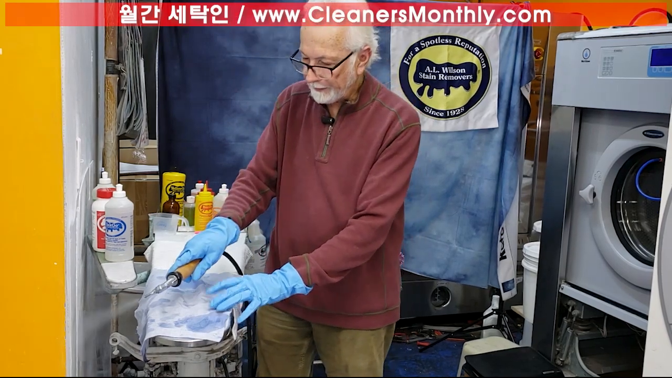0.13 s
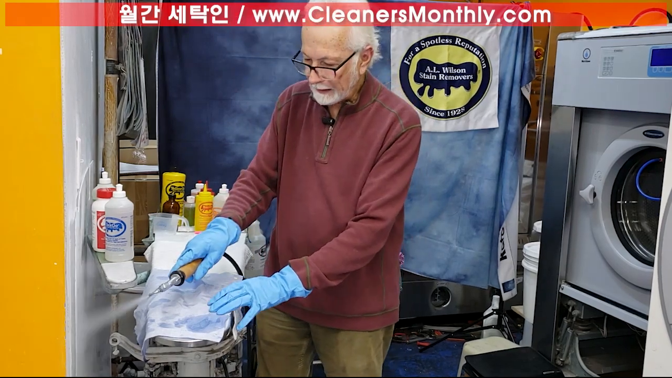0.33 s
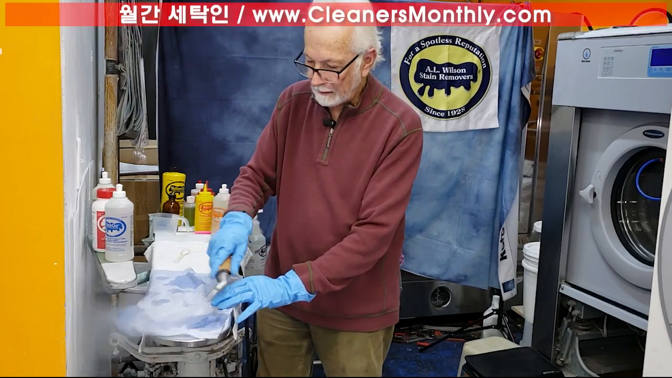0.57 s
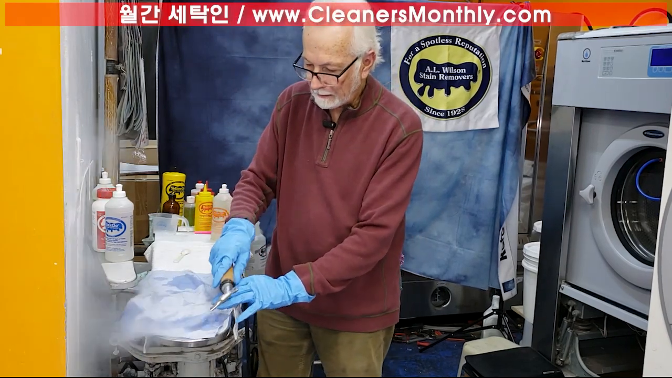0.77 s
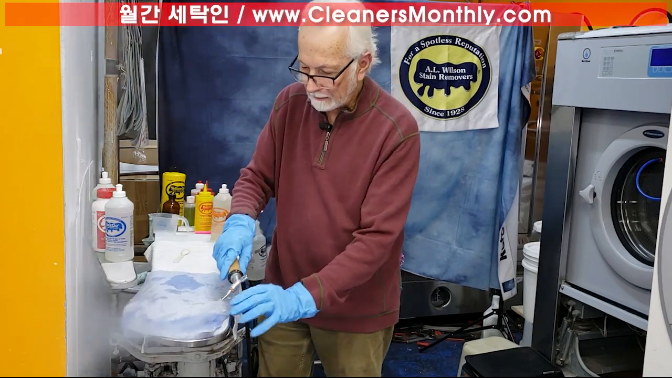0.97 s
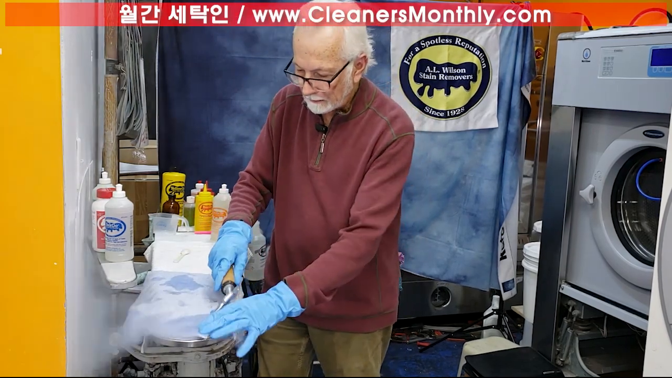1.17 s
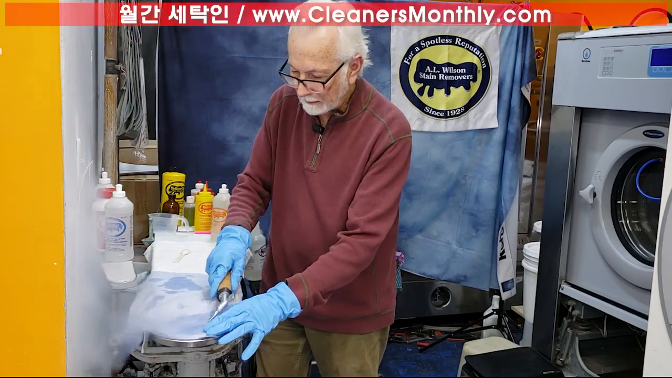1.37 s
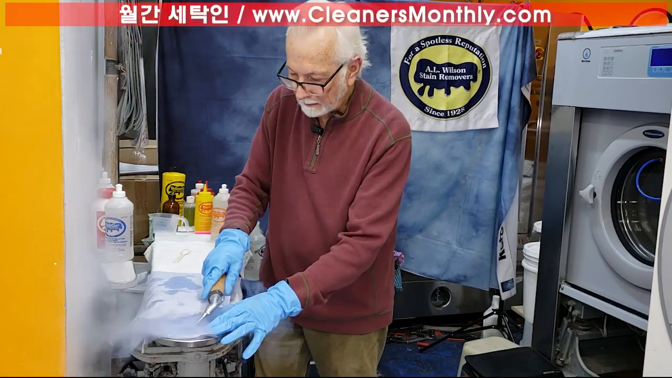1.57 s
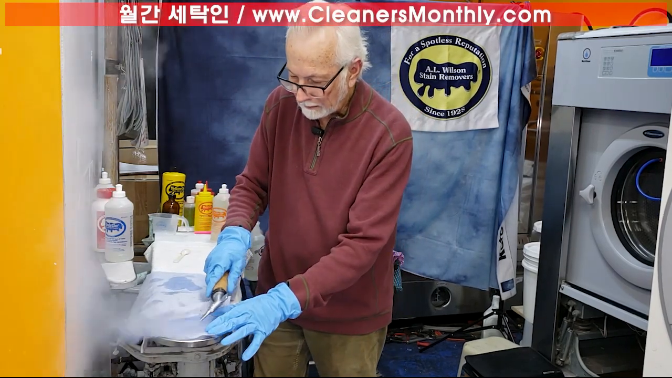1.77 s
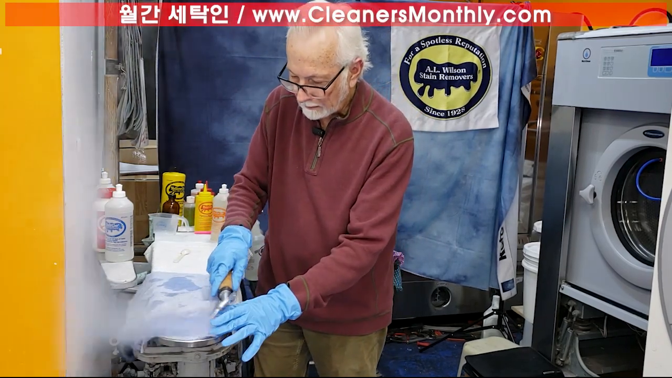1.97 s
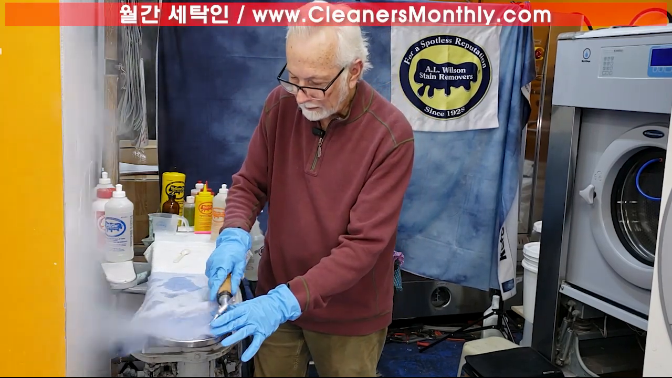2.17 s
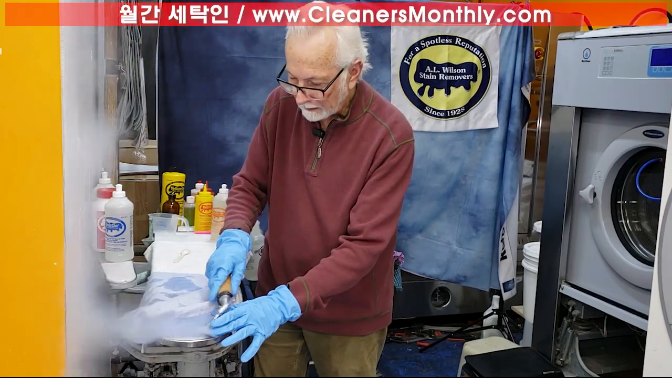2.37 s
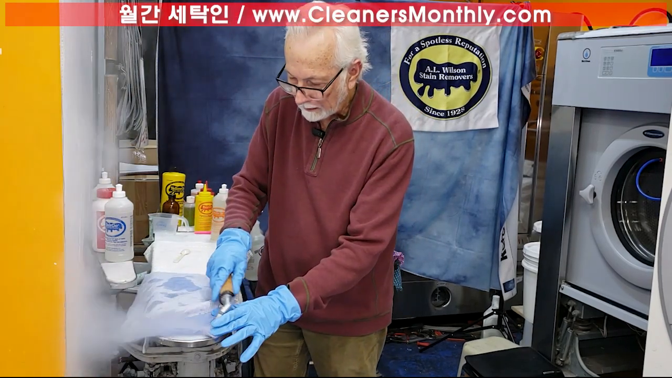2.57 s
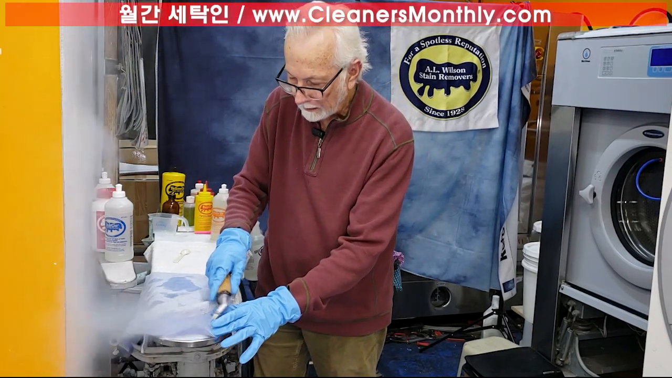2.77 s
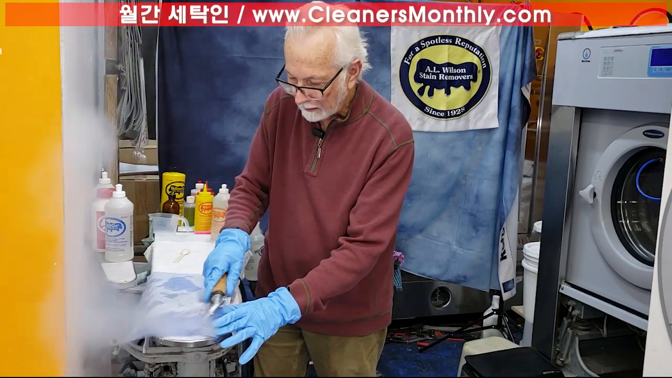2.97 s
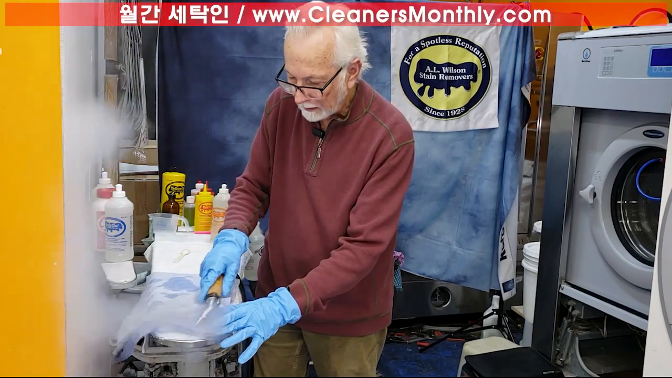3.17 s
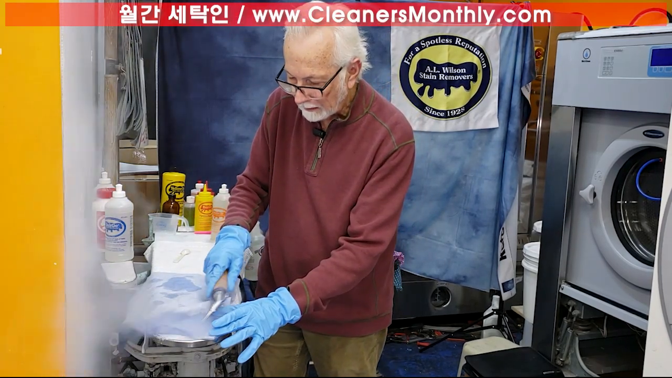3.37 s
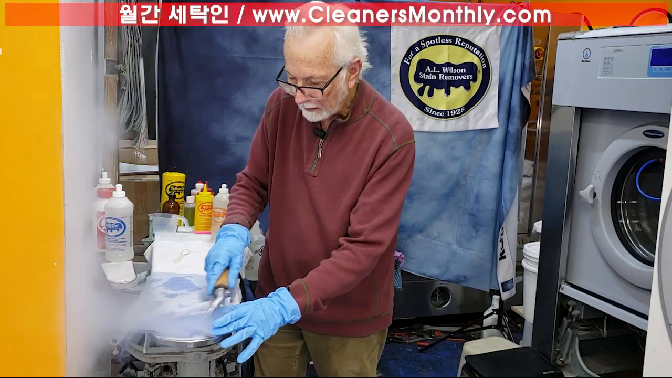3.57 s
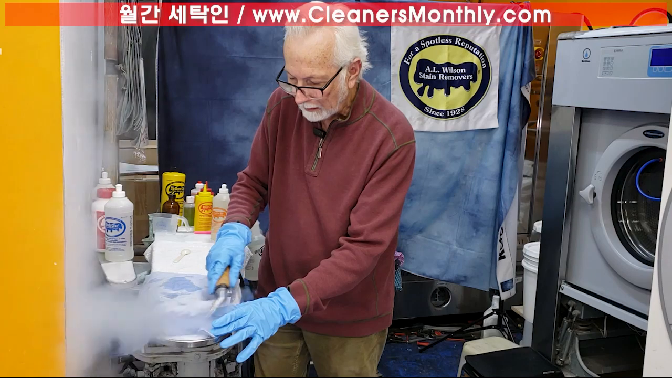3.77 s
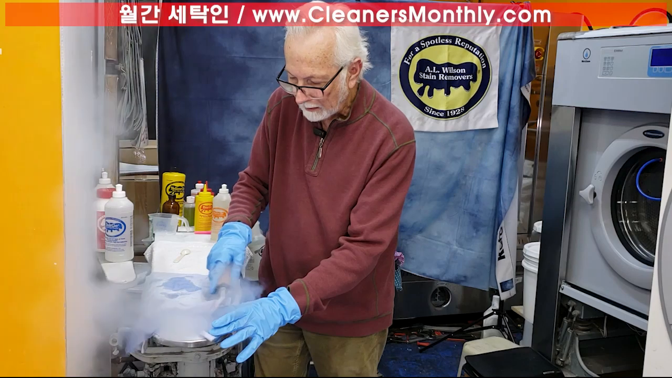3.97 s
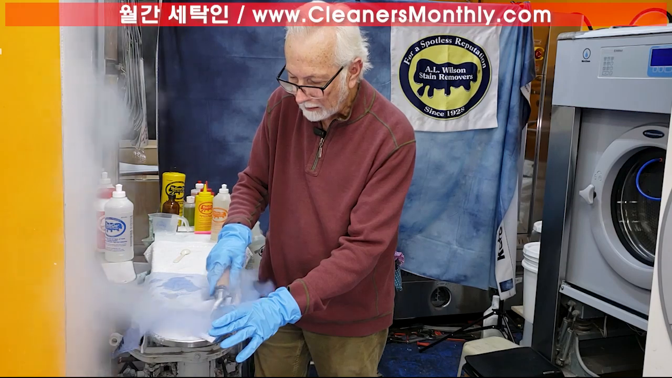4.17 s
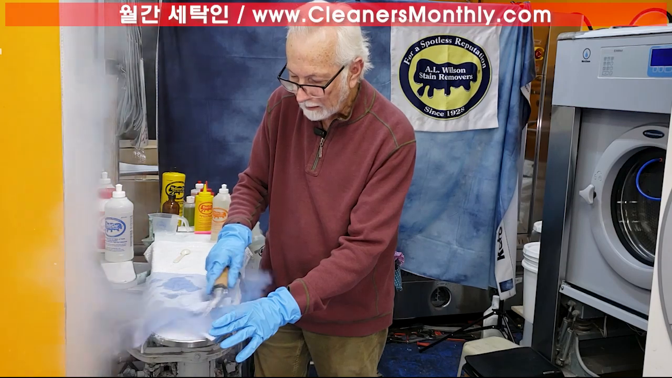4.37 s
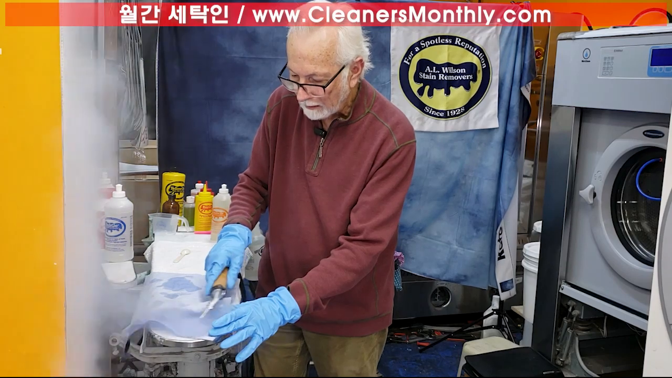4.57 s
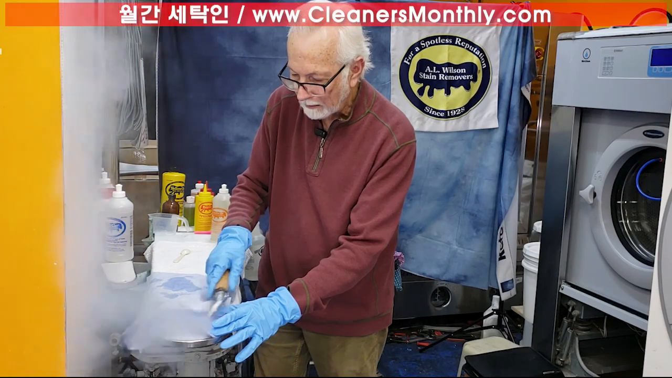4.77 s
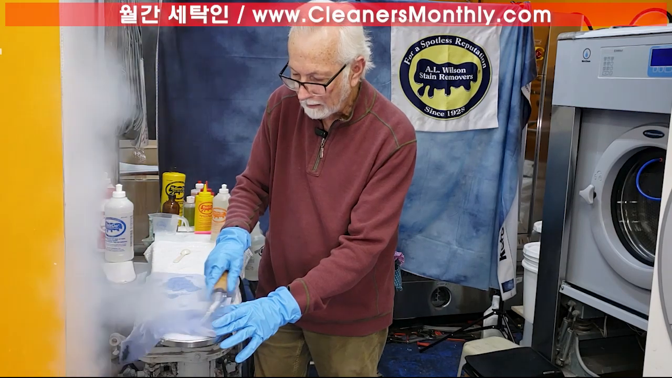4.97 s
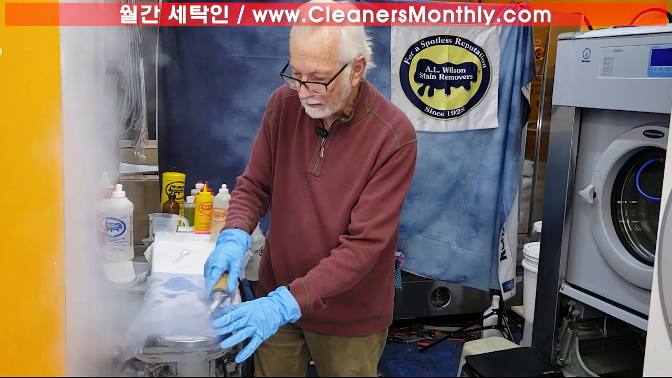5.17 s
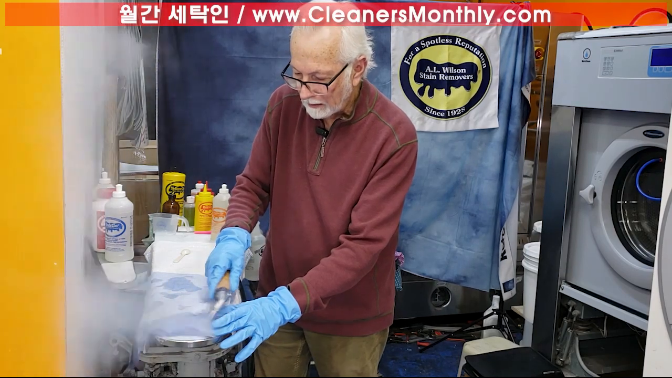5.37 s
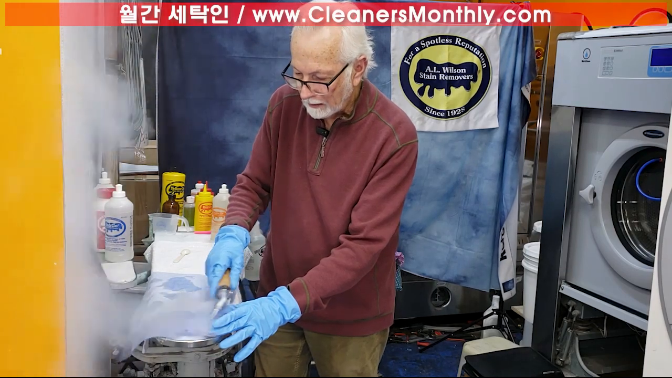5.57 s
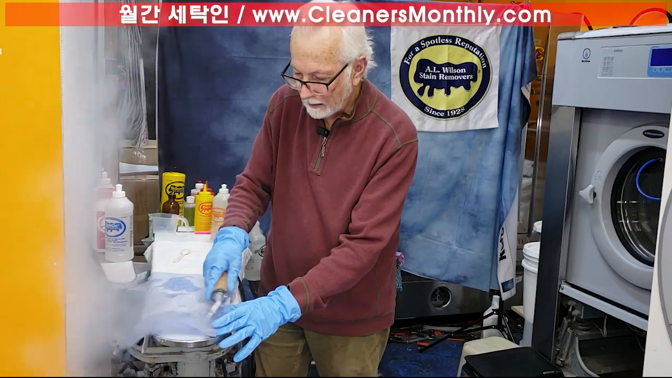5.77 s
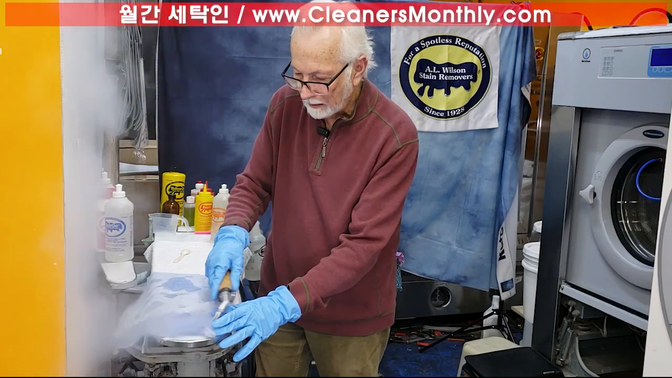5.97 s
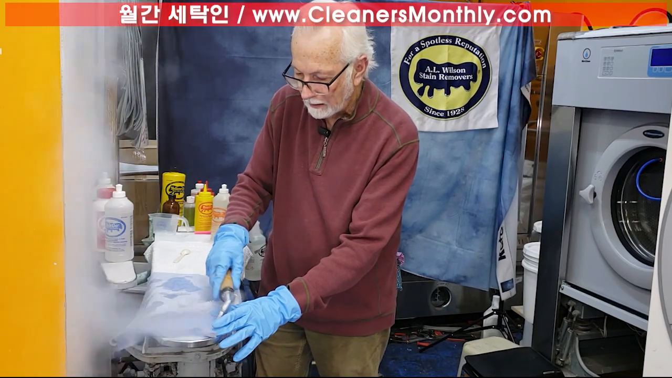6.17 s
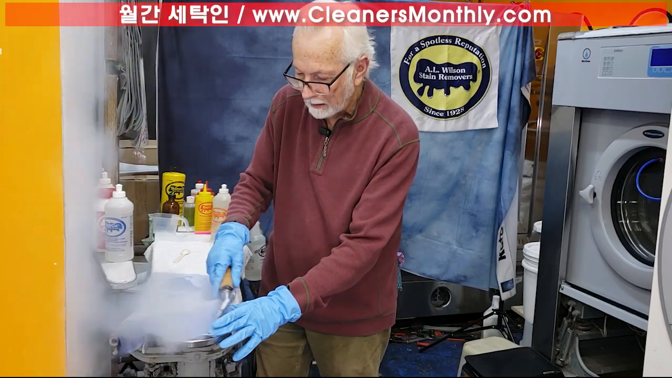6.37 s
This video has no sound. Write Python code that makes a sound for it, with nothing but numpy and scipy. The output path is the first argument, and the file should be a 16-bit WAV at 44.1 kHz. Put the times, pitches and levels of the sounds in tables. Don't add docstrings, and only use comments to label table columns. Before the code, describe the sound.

For a fraction of a second there is only faint motor hum and a small dull ring. Then a steam gun opens with a thin singing hiss that quickly swells into a loud, bright jet. Against cloth it adds a lower roar and rasp, brief breathy whistles and soft slaps. The hiss dips midway and surges again near the end. Close, dry, single chest microphone in a small workshop.

```python
import sys
import numpy as np
from scipy import signal
from scipy.fft import rfft, irfft, next_fast_len
from scipy.io import wavfile

SR = 44100
rng = np.random.default_rng(int(sys.argv[2]) if len(sys.argv) > 2 else 0)


def generate_wav(signal):
    frames = np.transpose(np.atleast_2d(signal))
    scaled = np.clip(frames, -1, 1) * 32767
    pcm = np.round(scaled).astype(np.int16)
    wavfile.write(sys.argv[1], SR, pcm)


def convert_level_to_amplitude(level_db):
    exponent = np.asarray(level_db, float) / 20
    return 10 ** exponent


N = 283122
T = np.arange(N) / SR
SIZE = next_fast_len(N)
HZ = np.maximum(np.arange(SIZE // 2 + 1) * SR / SIZE, 1)
OCTAVE = np.log2(HZ)


def rms_one(x):
    return x / np.sqrt(np.mean(x ** 2) + 1e-20)


def in_time(rows):
    s, *columns = np.transpose(rows)
    return [np.interp(T, s, column) for column in columns]


def swells(rows, point=1.9):
    s, length, *columns = np.transpose(rows)
    coarse = T[::64]
    phase = np.clip((coarse - s[:, None]) / (1.26 * length[:, None]), -0.5, 0.5)
    bumps = np.cos(np.pi * phase).clip(0) ** point
    return [np.interp(T, coarse, column @ bumps) for column in columns]


def before(s, fade_s):
    return np.clip((s - T) / fade_s, 0, 1)


def drift(rate, depth_db):
    r = np.exp(-40 * np.pi * rate / SR)
    coarse = rng.standard_normal(N // 20 + 4002)
    slow = signal.lfilter([1], [1, -2 * r, r * r], coarse)[4000:]
    return np.interp(np.arange(N) / 20, np.arange(len(slow)), convert_level_to_amplitude(depth_db * rms_one(slow)))


def coloured(points):
    hz, db = np.transpose(points)
    return rfft(rng.standard_normal(SIZE)) * convert_level_to_amplitude(np.interp(np.log(HZ), np.log(hz), db))


def above(edge_hz, soft):
    x = np.clip((OCTAVE - np.log2(edge_hz)) / soft + 0.5, 0, 1)
    return x * x * (3 - 2 * x)


def turbulence(points, zones_hz, levels_db, shared, patchy_db, patch_rate, soft, count):
    out = 0
    noises = [coloured(points), coloured(points)]
    zones = zip(zones_hz, zones_hz[1:], levels_db, patchy_db)
    for z, (low, high, level_db, flicker_db) in enumerate(zones):
        shares = [above(hz, soft) for hz in np.geomspace(low, high, count + 1)]
        zone = 0
        for k in range(count):
            gain = np.sqrt(np.abs(shares[k] - shares[k + 1]))
            strip = irfft(noises[(z * count + k) % 2] * gain, SIZE)[:N]
            zone = zone + strip * drift(patch_rate, flicker_db)
        out = out + rms_one(zone * shared) * convert_level_to_amplitude(level_db)
    return out


def whistle(s, length, hz, width_hz, db):
    start, size = round((s - length) * SR), round(2 * length * SR)
    r = np.exp(-np.pi * width_hz / SR)
    tone = rng.standard_normal(SR * 3 // 4)
    for _ in range(2):
        tone = signal.lfilter([1, 0, -1], [1, -2 * r * np.cos(2 * np.pi * hz / SR), r * r], tone)
    burst = rms_one(tone[-size:]) * np.hanning(size) * convert_level_to_amplitude(db)
    out = np.zeros(N)
    out[max(start, 0):start + size] = burst[max(-start, 0):]
    return out


# t/s, level/dB, aim/dB, splash/dB
JET = [(0.29, -55, -7, -24), (0.36, -46.5, -6.5, -9), (0.46, -42, -7.5, -7), (0.67, -27, -4, -3.5),
       (0.8, -24, -5, -5), (0.9, -16, -6, -4), (1.33, -13.5, -4, -9), (1.5, -15.5, -4.5, -5.5),
       (1.57, -14.5, -4.5, -9), (2.53, -16.5, -3, -9.5), (2.75, -18.5, -1.5, -13.5), (3.28, -25, -4, -5),
       (3.87, -21, -5, -7.5), (4.08, -25.5, -5.5, -4.5), (4.9, -26, -4, -6), (5.53, -15.5, -3.5, -8),
       (6.39, -15, -3, -8), (6.42, -12.5, -4, -9.5)]
JET_ZONES_HZ = [3750, 5600, 8600, 11600, 14300, 16500]
# f/Hz, level/dB per Hz
JET_COLOUR = [(3000, -35), (3720, -14.5), (4450, -6), (4700, -2), (4900, 0.5), (5080, -2.5), (5250, -8),
              (5600, -17), (7200, -6.5), (8330, -10.5), (9560, -1), (10700, -4), (11600, -10), (13400, -2),
              (14300, -9), (15500, -14)]
# t/s, length/s, change/dB, tilt towards the top/dB
FLICKS = [(.35, 0.089, 1.5, 3), (.8, .1, 1, 1), (1.38, 0.23, 1.5, -5), (1.47, 0.13, -2.5, 1.5),
          (1.62, 0.39, 1.5, -1.5), (1.76, 0.062, -1.5, -5), (1.82, 0.037, 4, 1), (1.87, 0.063, -2, 1.5),
          (1.96, 0.21, 2, -6), (2.06, 0.085, 1.5, 2), (2.29, 0.17, 0, -4.5), (2.45, 0.055, 3.5, -4.5),
          (2.58, 0.081, 2, 4), (2.98, 0.055, -1.5, 0), (3.03, 0.048, 2, -4), (3.14, .1, -2.5, 1),
          (3.23, .08, 1, 5), (3.3, 0.075, -2.5, 1), (3.47, 0.1, -3.5, 1.5), (3.92, 0.079, 1.5, 2.5),
          (4.11, 0.067, -1, 1), (4.63, .08, 1, -1.5), (4.97, 0.1, 3, -1), (5.22, 0.087, 2.5, 1),
          (5.57, 0.054, 2, 1), (5.75, 0.08, 1, 3.5), (5.92, .12, -0.5, 5.5), (5.99, .05, 0.5, 3.5),
          (1.3, .05, 0.5, -2.5), (1.66, .06, 1, -5), (2.19, .06, 1.5, -5), (.73, .1, 0, 3),
          (5.4, .12, 1.5, -0.5), (6.11, 0.12, -1.5, 1.5), (6.18, 0.07, 2.5, 1.5), (6.31, .08, 0.5, -0.5),
          (6.39, .05, -2, 3.5)]
# mean/dB, then dB per dB of level, aim, splash, flick and tilt, while thin/dB
JET_LAW = [
    (-27, 1.03, 0.27, 1, 0.62, -0.58, -9),
    (-30.5, 1.02, -1.73, -0.079, 1.24, -0.2, -12),
    (-24, 1.015, .99, -0.12, 1.08, 0.14, 1),
    (-26.5, 1.19, -0.94, -0.34, 1.3, 0.73, 5.5),
    (-34.5, 0.98, -0.57, -0.43, .7, 0.49, -3),
]
OPENS_S = (.31, 0.29, 0.26, 0.25, .26)
OPENING_S = 0.065
MEAN_JET_DB, MEAN_AIM_DB, MEAN_SPLASH_DB = -20, -4, -7
THIN_UNTIL_S, FILL_S = 0.53, 0.083


def jet(sputter):
    level, aim, splash = in_time(JET)
    flick, tilt = swells(FLICKS)
    controls = [np.ones(N), level - MEAN_JET_DB, aim - MEAN_AIM_DB, splash - MEAN_SPLASH_DB,
                flick, tilt, before(THIN_UNTIL_S, FILL_S)]
    levels = np.array(JET_LAW) @ np.array(controls)
    valve = np.clip((T - np.array(OPENS_S)[:, None]) / OPENING_S, 1e-4, 1)
    levels += 40 * np.log10(valve)
    return turbulence(JET_COLOUR, JET_ZONES_HZ, levels, sputter,
                      patchy_db=(1.28, 2.0, 1.74, 2.4, 2.3), patch_rate=15.0, soft=0.065, count=5)


# t/s, length/s, f/Hz, width/Hz, level/dB
NOZZLE = [(.315, .04, 4500, 450, -68), (.41, 0.06, 4500, 350, -56), (.362, 0.045, 4500, 450, -48.5),
          (.27, .05, 7800, 900, -82), (.245, .03, 11000, 2500, -86), (.3, .04, 6400, 700, -90),
          (0.54, 0.06, 4550, 400, -43), (.47, 0.11, 4540, 350, -48), (.59, .07, 4500, 450, -41),
          (.43, .11, 7650, 650, -52), (0.296, .04, 10600, 800, -65), (0.33, .05, 13500, 800, -47),
          (.34, .05, 10000, 900, -54), (0.48, .04, 1070, 440, -50), (0.56, .1, 1160, 550, -41.5),
          (.51, .05, 2320, 250, -50), (.62, 0.14, 2450, 330, -42)]


def nozzle():
    return sum(whistle(*row) for row in NOZZLE)


# t/s, jump/dB, fade/s
SLAPS = [
    (1.053, 2, 0.045),
    (1.19, 2, .04),
    (1.43, 1.5, 0.033),
    (3.243, 2, 0.06),
    (3.39, 2, 0.043),
    (3.597, 6.5, 0.06),
    (5.085, -1, 0.039),
]


def slaps():
    out = 0
    for s, db, fade_s in SLAPS:
        out = out + db * np.clip((T - s) / 0.005, 0, 1) * np.exp(-np.maximum(T - s, 0) / fade_s)
    return out


# t/s, drive/dB, slack of the cloth/dB
CLOTH = [(.3, -51, .1), (.47, -51, -3), (.64, -34, -2), (.71, -33.5, 2.5), (.84, -30, 1), (1.05, -30, -2),
         (1.5, -38.5, 0.5), (1.97, -50.5, 1), (2.28, -49.5, 1), (2.87, -45.5, -0.5), (3.26, -43, 1),
         (3.76, -49, -0.5), (4.41, -44, 1), (4.89, -46, -0.5), (5.21, -41.5, 3), (5.42, -39, -3.5),
         (5.85, -41, -1.5), (6.42, -39.5, -4)]
CLOTH_ZONES_HZ = [400, 550, 720, 1100]
WEAVE_ZONES_HZ = [1100, 1600, 2050, 2750, 3250, 3750]
# f/Hz, level/dB per Hz
CLOTH_COLOUR = [(210, -48), (350, -9), (425, -14.5), (470, -7.5), (543, -9), (595, -1.5), (665, -1.5),
                (858, 3.5), (1030, -1.5), (1460, -1), (1810, -10.5), (2380, -8), (2880, -17.5), (4000, 8),
                (5200, -32), (8800, -120)]
# t/s, length/s, swell/dB, depth/dB
PRESSES = [(.76, 0.12, 5, 2), (.88, 0.18, 5.5, 1), (1.07, 0.068, 4, 0), (1.2, 0.26, 6, 9),
           (1.44, 0.37, 7.5, 2.5), (1.61, 0.36, 7, 2.5), (1.78, 0.11, 7.5, -2.5), (1.92, 0.33, 13, 6),
           (2.06, 0.16, 9.5, -5), (2.19, 0.08, 2, -6), (2.31, 0.13, 15, 1.5), (2.7, 0.13, 6, -5),
           (2.9, 0.06, 6.5, -7), (3.04, .14, 3, 2), (3.31, 0.11, 6, 4), (3.43, 0.15, 9, 7),
           (3.61, 0.07, 2.5, -7), (3.72, 0.17, 2.5, -4), (3.84, .06, 4, -3), (3.91, .07, -6, 1),
           (4.29, 0.12, 4.5, 8), (4.42, 0.19, 3, 9), (4.69, 0.13, -1.5, 5), (4.87, 0.15, 6, 11),
           (5.0, 0.083, 2.5, 9), (5.11, 0.16, 1.5, 13), (5.21, 0.11, 0.5, 8.5), (5.47, 0.11, 6, -8),
           (5.68, .12, 5.5, -6), (5.87, 0.078, 7.5, -6), (6.04, 0.16, 7, 2), (6.28, 0.069, 9, -4)]
# mean/dB, then dB per dB of drive, swell, depth and jet,
# before arrival/dB, while thin/dB
CLOTH_LAW = [
    (-67, 0.8, 0.28, 0.73, .01, -15, 2),
    (-58.5, 1.08, 0.9, 0.98, 0.011, -14, -5),
    (-49.5, 0.91, 0.84, 0.017, 0.014, -2.5, -0.5),
    (-48.5, 0.78, 0.3, .01, 0.015, 6.5, 3.5),
    (-51, 0.41, 0.26, .01, 0.018, 0.5, -8),
    (-48, 0.45, 0.09, .01, 0.0086, -0.5, -11),
    (-55, 0.26, 0.054, .01, 0.16, -17, -20),
    (-45, 0.058, .05, .01, 0.3, -0.5, -40),
]
# t/s, level/dB
LANDING = [
    (4.928, 1.5),
    (4.942, -2),
    (4.974, -6),
    (4.980, 7),
    (5.07, 9.5),
]
LANDING_SHARE = (1, 0.67, 0.67, 0.56, 0.57, 0.55, 0.12, 0.1)
MEAN_DRIVE_DB = -45
ARRIVE_S, APPROACH_S = 0.743, 0.082


def cloth(sputter):
    drive, slack = in_time(CLOTH)
    swell, depth = swells(PRESSES, point=1.36)
    controls = [np.ones(N), drive - MEAN_DRIVE_DB, swell, depth + slack, in_time(JET)[0] - MEAN_JET_DB,
                before(ARRIVE_S, APPROACH_S), before(THIN_UNTIL_S + 0.059, FILL_S)]
    levels = np.array(CLOTH_LAW) @ np.array(controls)
    levels += np.outer(LANDING_SHARE, in_time(LANDING)[0] + slaps())
    pocket = turbulence(CLOTH_COLOUR, CLOTH_ZONES_HZ, levels[:3], sputter ** 1.2,
                        patchy_db=(1.8, 1.7, 1.7), patch_rate=8.6, soft=0.083, count=3)
    weave = turbulence(CLOTH_COLOUR, WEAVE_ZONES_HZ, levels[3:], sputter ** 0.54,
                       patchy_db=(2.5, 2.65, 2.3, 1.9, 2.6), patch_rate=8.1, soft=0.094, count=3)
    pocket_fills = np.clip((T - 0.35) / 0.11, 0, 1)
    weave_fills = np.clip((T - 0.31) / 0.26, 0, 1) ** 1.9
    return pocket_fills * pocket + weave_fills * weave


# t/s, length/s, f/Hz, width/Hz, level/dB
WHISTLES = [(2.79, 0.028, 1410, 67, -33.5), (2.883, 0.083, 2360, 160, -39), (3.441, 0.035, 1620, 43, -37),
            (3.96, 0.03, 2100, 300, -37.5), (4.414, 0.038, 622, 23, -34.5), (.775, .04, 1130, 360, -32),
            (1.0, .04, 1020, 350, -30), (0.97, 0.032, 980, 230, -31), (1.155, .025, 1000, 250, -29),
            (1.445, .03, 760, 200, -37), (1.209, 0.042, 1080, 250, -28.5), (4.404, 0.087, 408, 66, -50.5),
            (4.693, 0.05, 382, 120, -50.5), (5.03, .055, 400, 90, -50), (5.24, .07, 396, 60, -49),
            (5.10, 0.02, 810, 120, -28.5), (5.105, 0.024, 410, 72, -36), (5.184, 0.086, 394, 48, -50),
            (.62, .05, 1220, 60, -41), (.67, 0.051, 980, 60, -36), (.42, .03, 1210, 120, -53),
            (3.4, .025, 780, 200, -38), (3.253, .012, 750, 400, -37), (3.28, 0.018, 800, 150, -38),
            (3.345, .02, 840, 150, -37.5), (1.07, .03, 920, 130, -28), (.91, .03, 710, 150, -30),
            (5.13, 0.028, 510, 57, -34), (5.185, 0.025, 646, 60, -34), (5.22, .03, 710, 65, -38),
            (5.132, 0.064, 1400, 160, -37), (5.345, 0.03, 1460, 73, -32.5), (5.125, 0.046, 490, 170, -42),
            (5.5, 0.036, 770, 200, -39), (5.9, .04, 720, 130, -42), (3.46, 0.02, 640, 67, -40),
            (6, 0.026, 1000, 110, -48)]


def folds():
    return sum(whistle(*row) for row in WHISTLES)


# t/s, length/s, thud/dB, flutter/dB
PUFFS = [(.85, 0.17, 1, 9), (.98, 0.22, 17, 6), (1.09, 0.11, 12, 16), (1.21, 0.22, 11, 13),
         (1.5, 0.29, 5, -11), (2.88, 0.15, 12, 6), (3.66, 0.26, 4, 4), (4.68, 0.2, 4, 5),
         (5.14, .12, 11, 12), (5.28, 0.17, 7, 13), (5.4, 0.22, 8, 19), (5.55, 0.15, 10, 14),
         (5.65, 0.13, 12, 14), (5.76, 0.13, 10, 12.5), (5.88, 0.2, 3, 13), (5.99, 0.15, 15, 12),
         (6.09, 0.11, 7, 14), (6.2, 0.13, 11, 12), (6.33, 0.23, 6, 11.5), (6.42, .06, 16, 7)]
PUFF_ZONES_HZ = [42, 90, 220, 400]
# f/Hz, level/dB per Hz
PUFF_COLOUR = [(24, -42), (40, -26), (59, -6), (80, -21), (112, 2), (145, -1.5), (270, -4.5), (420, -1.5),
               (550, -30), (920, -120)]
STILL_AIR_DB = (-78, -71, -68)
RUSTLE_PER_FLUTTER, RUSTLE_PER_DEPTH, RUSTLE_PER_DRIVE = 0.87, 0.37, 0.092


def puffs():
    thud, flutter = swells(PUFFS)
    drive = np.maximum(in_time(CLOTH)[0] - MEAN_DRIVE_DB, 0)
    depth = swells(PRESSES)[1]
    rustle = RUSTLE_PER_FLUTTER * flutter + RUSTLE_PER_DEPTH * depth + RUSTLE_PER_DRIVE * drive
    levels = [still_db + rise for still_db, rise in zip(STILL_AIR_DB, (thud, flutter, rustle))]
    return turbulence(PUFF_COLOUR, PUFF_ZONES_HZ, levels, 1,
                      patchy_db=(3.0, 2.4, 2.2), patch_rate=2.5, soft=0.23, count=2)


# t/s, length/s, f/Hz, width/Hz, level/dB
EDDIES = [(.87, .06, 110, 50, -58), (1.085, .03, 175, 50, -54), (1.125, .025, 120, 60, -56),
          (1.26, .025, 180, 50, -55), (2.9, .06, 110, 50, -62), (3.0, .05, 190, 50, -64),
          (5.15, .04, 110, 30, -56), (5.33, .1, 115, 25, -56), (5.39, .05, 260, 80, -50),
          (5.42, .1, 149, 25, -50), (5.47, .07, 110, 25, -56), (5.65, .05, 149, 30, -53),
          (5.9, 0.063, 150, 28, -55), (6.09, .05, 160, 50, -56), (6.25, .1, 120, 20, -62)]


def eddies():
    return sum(whistle(*row) for row in EDDIES)


# f/Hz, level/dB per Hz
SHOP = [(300, -31), (450, -23), (640, -27), (800, -28), (1100, -29), (2400, -39), (3400, -55), (4700, -43),
        (5600, -59), (10500, -53), (13000, -68)]
SHOP_DB = -69.5
# f/Hz, level/dB rms
HUM = [
    (58.5, -82),
    (118.5, -83),
    (148.5, -81.5),
    (242, -81),
    (298, -74),
    (447, -84),
    (608, -84),
    (711, -79),
]
# t/s, length/s, f/Hz, width/Hz, level/dB
STIRS = [
    (0.045, .055, 307, 3, -56),
    (.16, .08, 300, 3, -66),
    (.01, .05, 250, 40, -68),
    (.45, .04, 310, 20, -68),
    (.058, .008, 10800, 900, -80),
    (0.112, 0.032, 1050, 150, -72),
    (0.29, 0.04, 1200, 500, -67),
    (.34, .09, 2100, 900, -73),
]


def shop():
    air = rms_one(irfft(coloured(SHOP) * above(370, 0.3), SIZE)[:N]) * convert_level_to_amplitude(SHOP_DB)
    motors = sum(convert_level_to_amplitude(db + 2.0) * drift(5, 2.3) * np.sin(2 * np.pi * hz * T) for hz, db in HUM)
    return air + motors + sum(whistle(*row) for row in STIRS)


def scene():
    sputter = drift(38, 0.53) * drift(360, 0.59)
    steam = jet(sputter) + nozzle() + cloth(sputter) + folds()
    mono = steam + puffs() + eddies() + shop()
    return np.array([mono, mono])


def low_pass(x):
    return signal.sosfilt(signal.butter(12, 16620, fs=SR, output="sos"), x)


def record(dry):
    excess = dry - dry / (1 + (dry / 0.62) ** 4) ** 0.25
    treble = signal.butter(6, 3500, "high", fs=SR, output="sos")
    rounded = dry - signal.sosfiltfilt(treble, excess)
    edge = signal.ellip(14, 0.3, 90, 15460, fs=SR, output="sos")
    return low_pass(signal.sosfilt(edge, rounded))


dry = scene()
out = record(dry)
generate_wav(out)
```